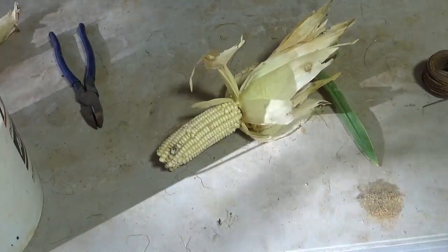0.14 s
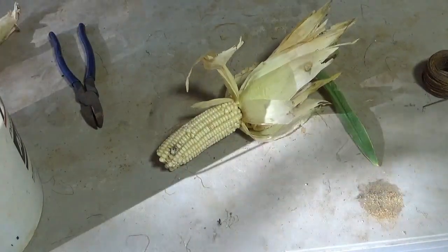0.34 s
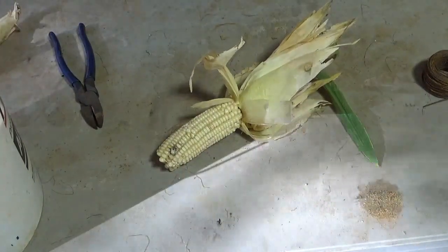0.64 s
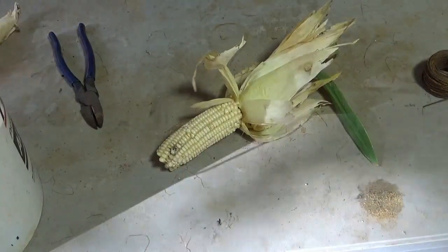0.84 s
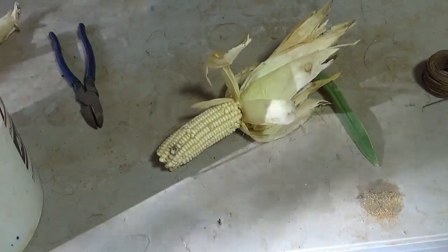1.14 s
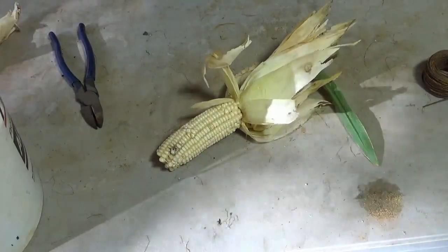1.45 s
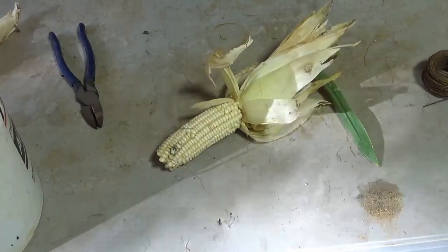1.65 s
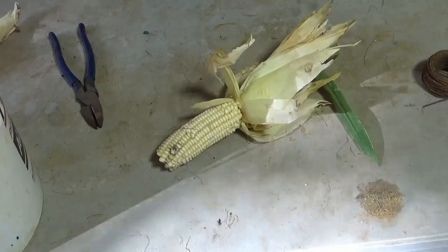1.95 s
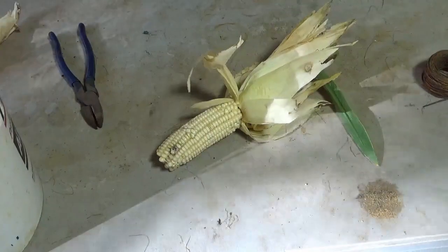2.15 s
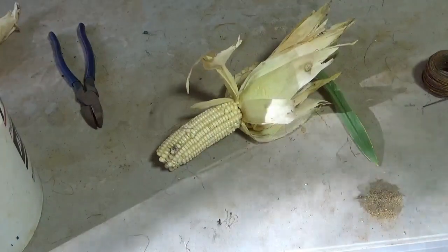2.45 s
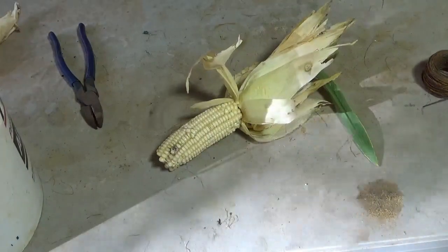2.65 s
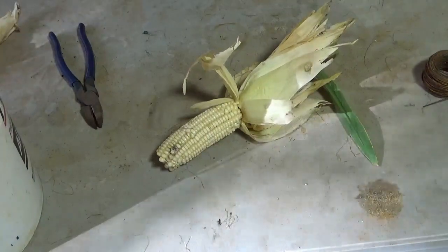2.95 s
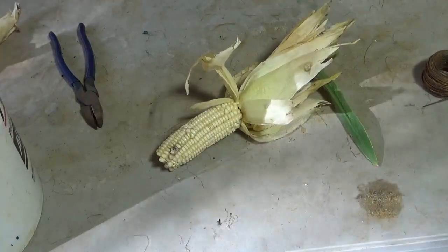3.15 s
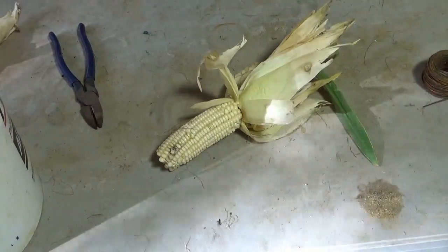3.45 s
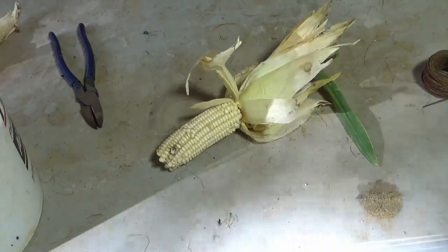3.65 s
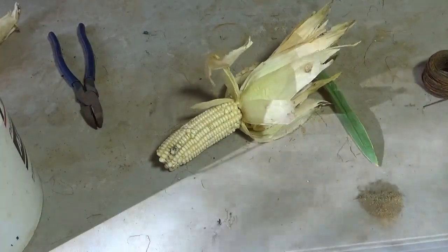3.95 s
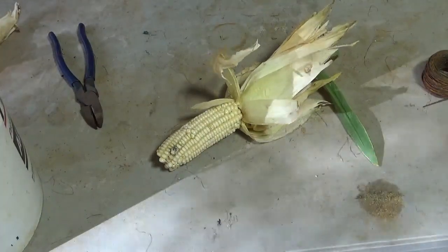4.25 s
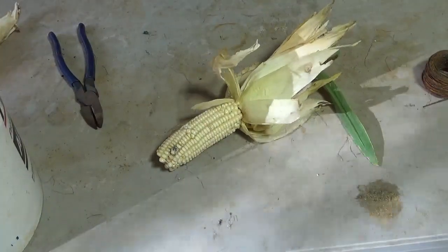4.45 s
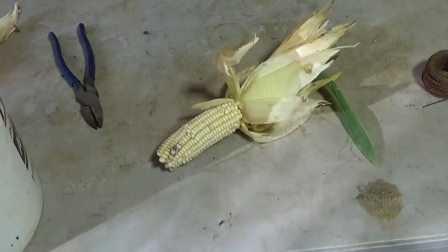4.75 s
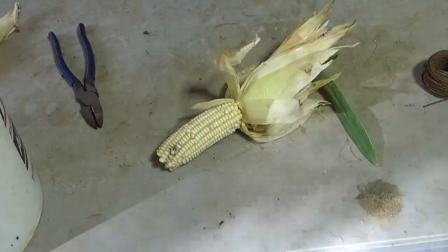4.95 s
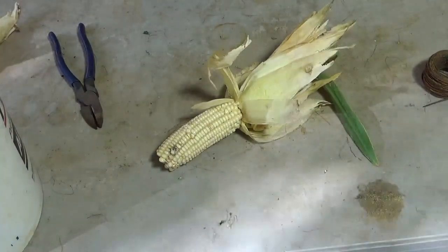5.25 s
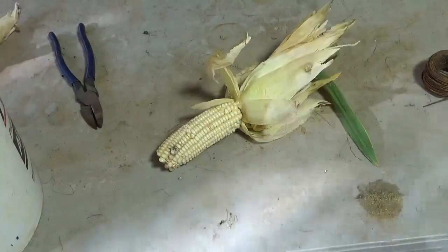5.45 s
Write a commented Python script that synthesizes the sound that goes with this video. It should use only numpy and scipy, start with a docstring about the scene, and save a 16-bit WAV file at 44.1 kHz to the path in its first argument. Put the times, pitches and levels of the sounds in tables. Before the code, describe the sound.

Dry corn husks rustle, crinkle and snap in irregular close handfuls, with a short rip and dull cob knocks over faint outdoor air.

```python
"""In a small shed, dry husks are peeled from an ear of corn by hand, close by.
Leaves slide over each other (small clicks and noise), rip along their fibres in short pulls (dense sprays of
clicks) and snap at the stiff ribs (short runs of ringing clicks); now and then the cob gives a dull knock.
Outdoor air (filtered noise), far traffic (low tones and rumble) and a faint thin whistle lie underneath."""
import sys
import numpy as np
from scipy import signal
from scipy.fft import rfft, irfft
from scipy.io import wavfile

SR = 44100
rng = np.random.default_rng(int(sys.argv[2]) if len(sys.argv) > 2 else 0)


def output_pcm(signal):
    """Save a mono or channel-first signal as 16-bit PCM at the path in sys.argv[1].

    Samples are clipped to [-1, 1] before scaling.
    """
    pcm = np.clip(np.atleast_2d(signal).T, -1, 1) * 32767
    wavfile.write(sys.argv[1], SR, np.round(pcm).astype(np.int16))


N = 246959
TIME = np.arange(N) / SR  # seconds
CUTOFF_HZ = 11030  # top of the sound

# tone colour of leaf sliding on leaf: pitch_hz, level_db (per Hz, shape only)
RUSTLE = [(200, -47), (900, -12.5), (2000, -3), (3200, 1), (5500, 3.5), (7000, -1.5), (8500, -9.5),
          (11000, -15.5)]
# tone colour of a hollow rub or a drumming leaf: pitch_hz, level_db (per Hz, shape only)
HOLLOW = [(45, -35), (200, -18.5), (400, -4.5), (750, 1.5), (1300, -0.5), (2000, -1.5), (4000, -8.5),
          (11000, -53)]


def from_db(db):
    """Turns decibels into an amplitude factor."""
    return 10 ** (np.asarray(db) / 20)


def rms_one(x):
    """Scales a signal to an average (RMS) level of 1."""
    return x / np.sqrt(np.mean(x ** 2) + 1e-20)


def high_pass(x, edge_hz, order=2):
    """Weakens everything below the edge."""
    return signal.sosfilt(signal.butter(order, edge_hz, "high", fs=SR, output="sos"), x)


def resonate(x, hz, q):
    """Lets one pitch ring; a higher q rings longer."""
    return signal.lfilter(*signal.iirpeak(hz, q, fs=SR), x)


def drift(rate_hz):
    """Smooth random wandering with spread 1; a higher rate wanders faster."""
    step = 40  # samples between computed points
    keep = np.exp(-2 * np.pi * rate_hz * step / SR)
    noise = rng.standard_normal(N // step + 2002)
    slow = signal.lfilter([1], [1, -2 * keep, keep * keep], noise)[2000:]  # skip the filter's start
    return np.interp(np.arange(N) / step, np.arange(len(slow)), rms_one(slow))


def colour(x, spectrum, size=4096):
    """Gives a sound the tone colour of a table; white noise keeps its overall power."""
    hz, db = np.transpose(spectrum)
    grid = np.linspace(1, SR / 2, size // 2 + 1)
    level = from_db(np.interp(np.log(grid), np.log(hz), db))
    # fold the cepstrum so that the filter reacts only after its input, as early as it can
    cepstrum = irfft(np.log(level))
    cepstrum[1:size // 2] *= 2
    cepstrum[size // 2 + 1:] = 0
    top_cut = np.sqrt(1 + (grid / CUTOFF_HZ) ** 20)
    response = irfft(np.exp(rfft(cepstrum)) / top_cut)[:size // 2]
    return signal.oaconvolve(x, response / np.linalg.norm(response))[:len(x)]


def stereo(mid, side, width):
    """Adds the side signal on the left and subtracts it on the right."""
    return mid + width * side * np.array([[1], [-1]])


def swell(start, end):
    """Rises and fades once between two times."""
    through = np.clip((TIME - start) / (end - start), 0, 1)
    return np.sqrt(np.abs(np.sin(np.pi * through)))


def fibres(per_s, spread_db, clump_db, even_s=0.045, clump_rate_hz=200):
    """Tiny breaks of uneven size that come in clumps; the pull of the hand evens out their power."""
    sizes = from_db(spread_db * np.minimum(rng.exponential(1, N), 4)) * rng.choice([-1, 1], N)
    happens = rng.random(N) < per_s / SR
    clicks = sizes * happens * from_db(clump_db * drift(clump_rate_hz))
    window = signal.windows.hann(2 * int(even_s * SR / 2) + 1)
    power = signal.oaconvolve(clicks ** 2, window / window.sum(), "same")
    return clicks / np.sqrt(np.abs(power) + 1e-6)


def facets(clicks, shift_db, q=9, count=10):
    """The leaf rings in many small facets, and bending keeps changing which of them sound."""
    out = clicks
    for hz in np.geomspace(1400, 9000, count):
        ring = resonate(clicks, hz, q)
        out = out + ring * from_db(shift_db * np.tanh(drift(31)))
    return out * np.std(clicks) / np.std(out)


def hand(attack_s=0.023, release_db_per_s=188, resting_db=-58, resting_grip_db=-8.5):
    """Speed of the sliding and firmness of the grip: each stroke sets in, holds and dies away as leaves settle."""
    # strokes that slide leaf over leaf: start_s, length_s, level_db (before the mix levels in sliding),
    # grip_db (hollow rub relative to the rustle, before mixing; a firm grip also muffles the crisp top)
    strokes = [(-.03, 0.08, -36, -3), (0.087, 0.074, -43.5, -3), (0.218, 0.068, -45.5, -5.5),
               (0.326, 0.065, -44, -2), (0.513, 0.024, -48.5, -25), (.605, 0.057, -45, -9),
               (0.674, 0.055, -41.5, -7), (0.72, 0.059, -39.5, -13), (1.201, 0.049, -45, -5),
               (1.275, 0.059, -42.5, -23), (1.404, 0.021, -43.5, -31), (1.759, 0.044, -38, -10.5),
               (1.837, 0.084, -49.5, -1), (1.925, .21, -40, -4.5), (2.505, 0.041, -37, -6),
               (2.572, 0.077, -37.5, -7.5), (2.705, 0.075, -38, -6.5), (2.835, 0.14, -42, -9.5),
               (3.035, 0.095, -46.5, -23), (3.112, 0.074, -43, -20), (3.187, 0.095, -41, -11),
               (3.242, 0.018, -39, -14), (3.354, 0.11, -50.5, -28), (3.85, 0.056, -51, 0),
               (4.154, 0.046, -38, -11.5), (4.582, 0.016, -46.5, 5), (4.83, 0.026, -42.5, -36),
               (4.962, 0.13, -47.5, -31), (5.147, 0.019, -45.5, -31), (5.25, .03, -44, -28),
               (5.28, .045, -40, -30), (5.366, .055, -43, -32)]
    # between strokes the held leaves keep stirring
    power = np.full(N, from_db(resting_db) ** 2)
    gripped = power * from_db(resting_grip_db) ** 2
    for start, length, db, grip_db in strokes:
        attack = np.clip((TIME - start) / attack_s, 0, 1)
        release_db = release_db_per_s * np.clip(TIME - start - length, 0, 1)
        stroke = attack * from_db(db - release_db)
        power = power + stroke ** 2
        gripped = gripped + (stroke * from_db(grip_db)) ** 2
    return np.sqrt(power), np.sqrt(gripped / power)


def sliding(rustle_db=-4.0, friction_db=-6, hollow_db=-0.5, crisp_hz=7000, crisp_db=-16, muffling=1.0,
            flutter_db=1.71, tick_db=18, ticks_per_s=45):
    """Ribbed leaves drag over each other in small jerks: fine crinkles and ticks on friction, and a hollow rub."""
    level, grip = hand()
    level = level * from_db(flutter_db * drift(27))
    crinkles = fibres(per_s=4000, spread_db=3.0, clump_db=2.5, even_s=0.12)
    friction = from_db(friction_db) * rng.standard_normal(N)
    ticks = from_db(tick_db) * (rng.random(N) < ticks_per_s / SR) * rng.standard_normal(N)
    rustle = colour(level * facets(crinkles + friction + ticks, shift_db=6.5), RUSTLE)
    # loosely held leaf edges add a crisp top
    edges = high_pass(rustle, crisp_hz)
    rustle = rustle + from_db(crisp_db) * edges / np.maximum(grip, .1) ** muffling
    rub = colour(level * grip * fibres(per_s=3000, spread_db=1, clump_db=2.0), HOLLOW)
    return from_db(rustle_db) * rustle + from_db(hollow_db) * rub


def settling(ticks_per_s=30, tick_db=-33.5, spread_db=2.5):
    """Bent fibres give way one by one while the ear is held."""
    sizes = from_db(tick_db + spread_db * np.minimum(rng.exponential(1, N), 3))
    ticks = sizes * (rng.random(N) < ticks_per_s / SR)
    return colour(facets(ticks, shift_db=4), RUSTLE)


def air(air_db=-51.5, width=0.4, alike_below_hz=330):
    """Steady outdoor wash; long waves reach both sides alike."""
    # tone colour of outdoor air: pitch_hz, level_db (per Hz, shape only)
    air_colour = [(25, -41), (60, -22), (125, -10.5), (300, -2), (750, 1.5), (1200, -1), (2200, -6),
                  (3200, -4), (4200, -8.5), (5800, -10), (9000, -15.5), (11000, -22)]
    mid, side = (colour(white, air_colour) for white in rng.standard_normal((2, N)))
    side = high_pass(side, alike_below_hz, order=1)
    return from_db(air_db) * stereo(mid, side, width)


def traffic(road_db=-81, waver_db=2):
    """Distant engine notes that swell and fade over a low road rumble with swells of its own."""
    # far engines: start_s, end_s, pitch_hz, level_db (at the height of the swell, before wavering)
    engines = [(-.6, 1.9, 137, -74.5), (2.3, 3.2, 101.4, -72.5), (3.6, 5.8, 102, -72.5)]
    # swells of the low rumble: start_s, end_s, level_db (added to the steady road level)
    rumble_swells = [(4.6, 5.252, -69), (5.448, 5.8, -64)]
    # tone colour of the road: pitch_hz, level_db (per Hz, shape only)
    rumble_colour = [(25, -24), (60, -8), (120, -7.5), (200, -4), (500, -32)]
    notes = np.zeros(N)
    for start, end, hz, db in engines:
        notes += from_db(db) * swell(start, end) * np.sin(2 * np.pi * hz * TIME)
    level = np.full(N, from_db(road_db))
    for start, end, db in rumble_swells:
        level += from_db(db) * swell(start, end)
    rumble = level * colour(rng.standard_normal(N), rumble_colour)
    return from_db(waver_db * drift(6.9)) * notes + rumble


def snapping(ring_q=4, ring_db=7, snap_db=13.0, run_cycles=12, rib_edge_hz=450, size=2048, count=14):
    """A rib gives way in a run of fractures that swells and fades; thick ribs ring lower and take longer."""
    # ribs snapping: start_s, strength_db (relative; snap_db is added), pitch_hz
    snaps = [(0.0114, -20, 4120), (.038, -26.5, 5630), (0.047, -19.5, 5020), (0.388, -18, 6270),
             (0.633, -26.5, 5580), (.655, -30, 2120), (0.707, -20.5, 2784), (.873, -33.5, 2830),
             (0.953, -32.5, 2470), (1.2225, -23.5, 2836), (1.2231, -19, 3730), (1.324, -27, 5240),
             (2.286, -25.5, 5150), (2.480, -31, 4800), (2.7, -28, 5800), (2.739, -21.5, 2110),
             (2.7591, -11, 5100), (2.776, -11.5, 4280), (2.986, -27.5, 5460), (3.205, -26.5, 5200),
             (3.287, -20.5, 6800), (3.594, -33, 6500), (4.0532, -17.5, 4584), (4.1645, -8, 4650),
             (4.846, -27.5, 6160), (4.997, -28.5, 6130), (5.284, -28, 4530), (5.368, -21, 6170),
             (5.399, -17, 7000)]
    # tone colour of a snap: pitch_hz, level_db (per Hz, shape only)
    crack_colour = [(200, -21), (1000, -19.5), (2000, -10.5), (2400, -7), (3900, -5.5), (4600, -12),
                    (5500, -3.5), (7000, -7), (11000, -19)]
    out = np.zeros(N + size)
    for (start_s, strength_db, hz), chance in zip(snaps, rng.random((len(snaps), 3, count))):
        through = (np.arange(count) + chance[0]) / count  # 0 to 1 along the run
        at = (through * run_cycles / hz * SR).astype(int)
        sign = np.sign(chance[2] - .5)
        fractures = np.zeros(size)
        fractures[at] = (.5 + chance[1]) * sign * np.sqrt(np.sin(np.pi * through))
        leaf = resonate(fractures, hz, ring_q)
        snap = colour(fractures + from_db(ring_db) * leaf, crack_colour)
        start = int(start_s * SR)
        out[start:start + size] += from_db(strength_db + snap_db) * snap / np.linalg.norm(snap)
    return high_pass(out[:N], rib_edge_hz)


def tension(start, build_s, tearing_s, build_db=31, release_db_per_s=491):
    """A pull builds up, holds while the strip tears, and drops when it comes free."""
    t = TIME - start
    slack_db = build_db * np.clip(1 - t / build_s, 0, 10)
    release_db = release_db_per_s * np.clip(t - build_s - tearing_s, 0, 1)
    return from_db(-slack_db - release_db)


def ripping(crackle_db=-1, veins_per_s=600, unsteady=0.34):
    """The tear jumps from vein to vein; each jump starts a spray of breaks and jerks the taut leaf."""
    # pulls that rip a strip off: start_s, build_s, tearing_s, fibre_db (crackle; crackle_db is added),
    # leaf_db (drumming of the taut leaf), edge_hz (lower edge, higher for a narrow strip),
    # sag_db (drop between veins, deep when it rasps)
    pulls = [(.35, 0.024, 0.014, -31, -70, 800, 5.5), (1.926, 0.11, 0.048, -24.5, -48, 400, 3),
             (2.744, 0.021, 0.0041, -25, -50, 900, 9.2), (5.352, 0.015, 0.029, -25, -49, 3040, 42)]
    # tone colour of the tear: pitch_hz, level_db (per Hz, shape only)
    rip_colour = [(200, -6), (900, -18.5), (1900, -2), (2500, -5), (3900, -2), (4600, -2.5), (5800, 1),
                  (7000, -2.5), (8500, -5.5), (11000, -10)]
    veins = np.cumsum(veins_per_s * np.exp(unsteady * drift(100))) / SR  # veins passed so far
    breaks = fibres(per_s=9000, spread_db=2.5, clump_db=-2.0, even_s=0.01)
    breaks = facets(breaks, shift_db=5.5)
    out = np.zeros(N)
    for start, build_s, tearing_s, fibre_db, leaf_db, edge_hz, sag_db in pulls:
        spray = breaks * rms_one(from_db(-sag_db * (veins % 1)))
        strip = high_pass(colour(spray, rip_colour), edge_hz)
        drum = colour(spray, HOLLOW)
        tear = from_db(crackle_db + fibre_db) * strip + from_db(leaf_db) * drum
        out += tension(start, build_s, tearing_s) * tear
    return out


def whistle(waver_hz=55, flicker_db=4, whistle_db=-1.5):
    """A thin tone, unsteady in pitch and level, that slides as it swells and fades."""
    # whistles: start_s, end_s, from_hz, to_hz, level_db (relative; whistle_db is added)
    whistles = [(0.423, 0.72, 3740, 3500, -54.5), (1.143, 1.504, 3630, 3580, -55),
                (1.424, 1.698, 3600, 3110, -57), (2.136, 2.33, 3500, 3200, -54),
                (4.274, 4.54, 3320, 3350, -58)]
    out = np.zeros(N)
    waver = waver_hz * drift(170)
    for start, end, from_hz, to_hz, db in whistles:
        through = np.clip((TIME - start) / (end - start), 0, 1)
        pitch = from_hz + (to_hz - from_hz) * through + waver
        out += from_db(db) * swell(start, end) * np.sin(2 * np.pi * np.cumsum(pitch) / SR)
    return out * from_db(whistle_db + flicker_db * drift(25))


def knocking(knock_db=10, scuff_db=-28, scuff_t60_s=0.33):
    """A soft blow on the cob, followed by the scuff of the loose leaves around it."""
    # the cob knocked about: start_s, level_db (relative; knock_db is added)
    knocks = [(0.482, -25.5), (1.734, -35), (2.06, -17.5), (3.23, -34), (4.229, -24.5), (4.233, -22),
              (4.596, -28.5)]
    # tone colour of the cob: pitch_hz, level_db (per Hz, shape only)
    cob_colour = [(150, -14), (500, -14), (1000, 9.5), (1500, 4.5), (2200, -1), (3500, -19), (11000, -31)]
    blows, scuff = np.zeros(N), np.zeros(N)
    for start, db in knocks:
        blows[int(start * SR)] = from_db(db)
        scuff += (TIME >= start) * from_db(db - 60 * np.abs(TIME - start) / scuff_t60_s)
    scuff_noise = from_db(scuff_db) * scuff * rng.standard_normal(N)
    return from_db(knock_db) * colour(blows + scuff_noise, cob_colour)


def shed(x, wall_hz=6500, first_echo_s=0.0015, t60_s=0.12, treble_t60_s=0.06, width=0.75):
    """Dense reflections from near walls; the treble dies first (t60 is the time to fall by 60 dB)."""
    t = TIME[:SR // 2]
    echoes = rng.standard_normal((2, len(t))) * (t > first_echo_s)
    dull = signal.sosfilt(signal.butter(2, wall_hz, fs=SR, output="sos"), echoes)
    bright = high_pass(echoes, wall_hz)
    fade = from_db(-60 * t / t60_s)
    treble_fade = from_db(-60 * t / treble_t60_s)
    # the minus sign keeps the two bands from cancelling where they meet
    tails = (dull * fade - bright * treble_fade) / np.linalg.norm(fade)
    mid, side = (signal.oaconvolve(x, tail)[:N] for tail in tails)
    return stereo(mid, side, width)


def scene(left_hz=3200, left_q=0.34, leaf_edge_hz=130, pan_db=3, shed_db=-11.5):
    """The ear is held a little to the left, which shows in the presence range only."""
    husks = sliding() + settling() + ripping() + snapping() + knocking()
    # small, light leaves radiate no deep bass
    husks = high_pass(husks, leaf_edge_hz)
    presence = resonate(husks, left_hz, left_q)
    direct = stereo(husks, presence, from_db(pan_db / 2) - 1)
    return direct + from_db(shed_db) * shed(husks) + air() + traffic() + whistle()


def record(dry):
    """The top is cut steeply."""
    return signal.sosfilt(signal.ellip(12, .1, 80, CUTOFF_HZ, fs=SR, output="sos"), dry)


dry = scene()
out = record(dry)
output_pcm(out)
```